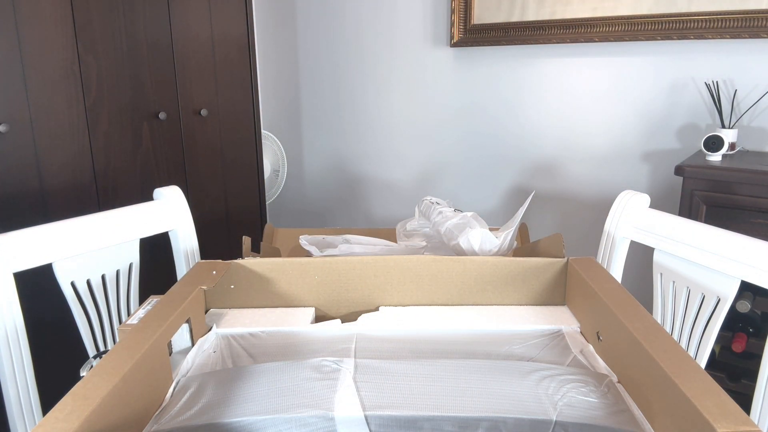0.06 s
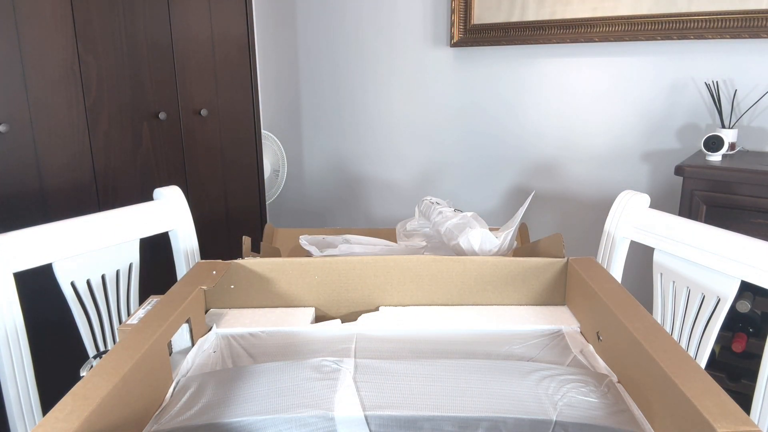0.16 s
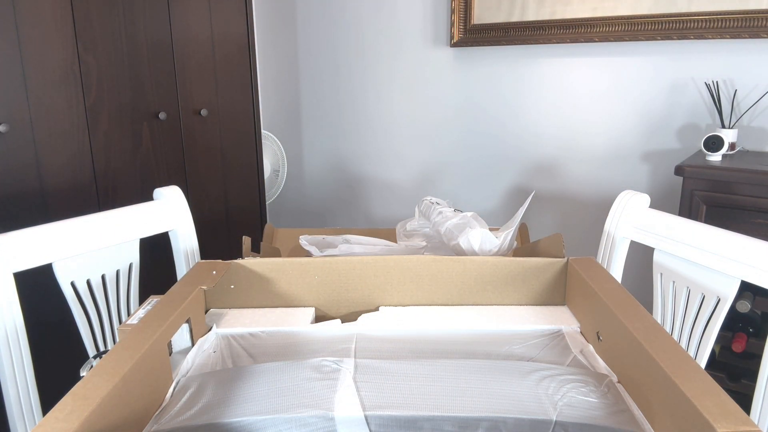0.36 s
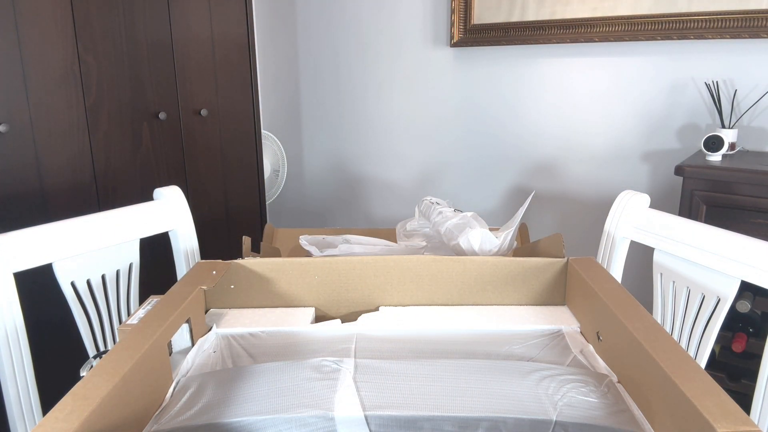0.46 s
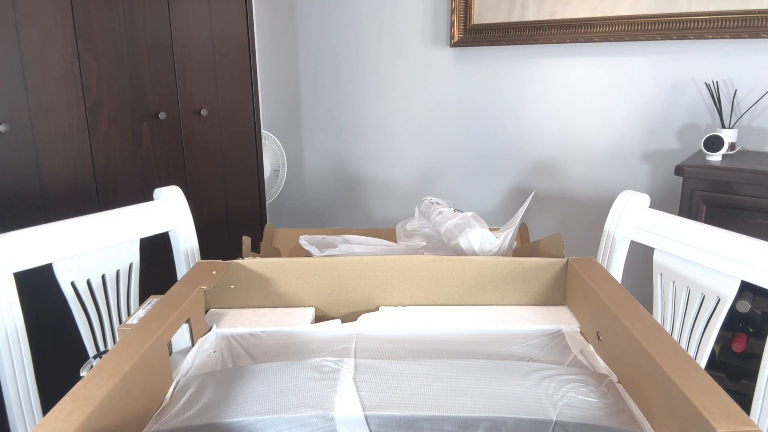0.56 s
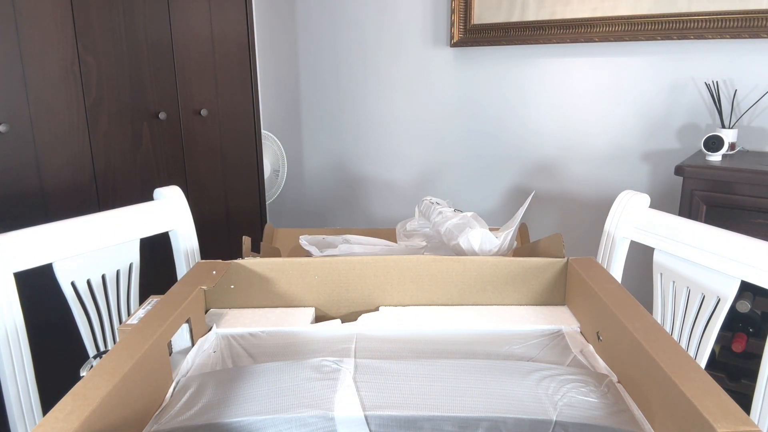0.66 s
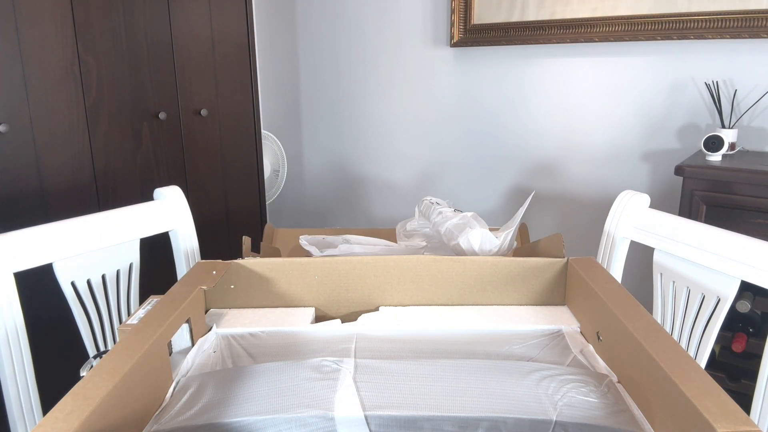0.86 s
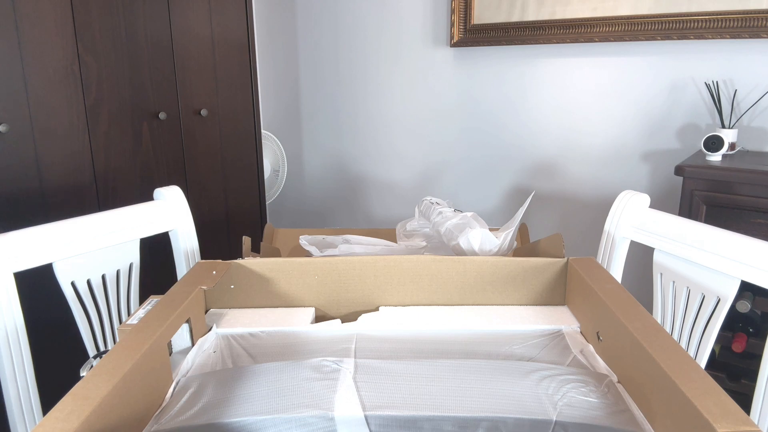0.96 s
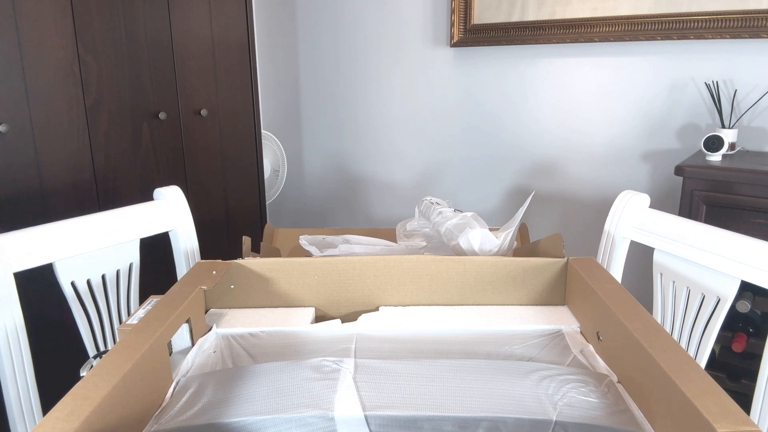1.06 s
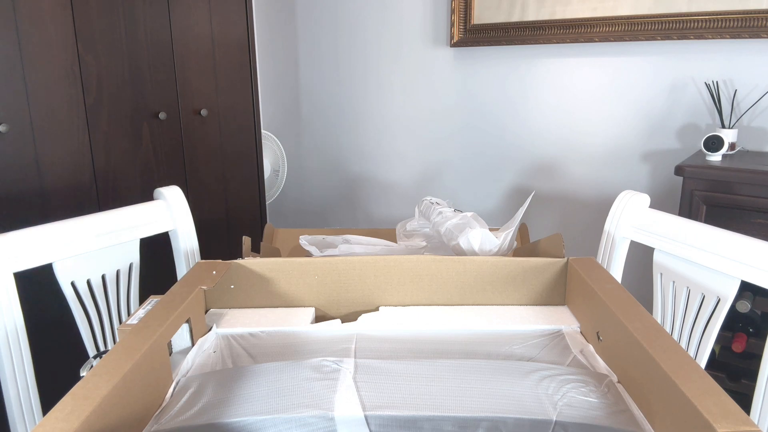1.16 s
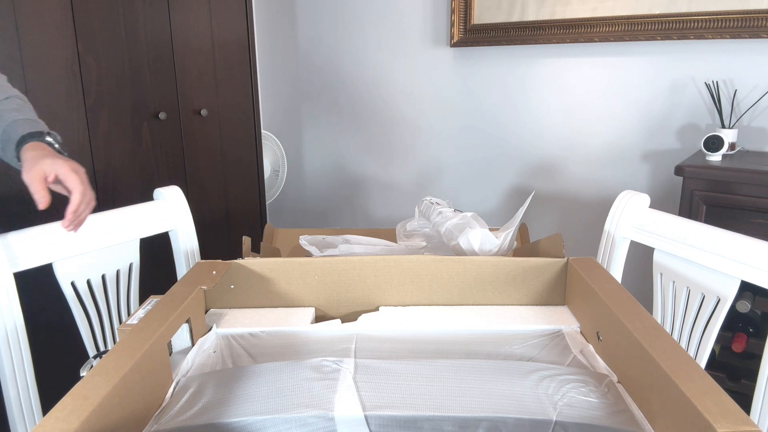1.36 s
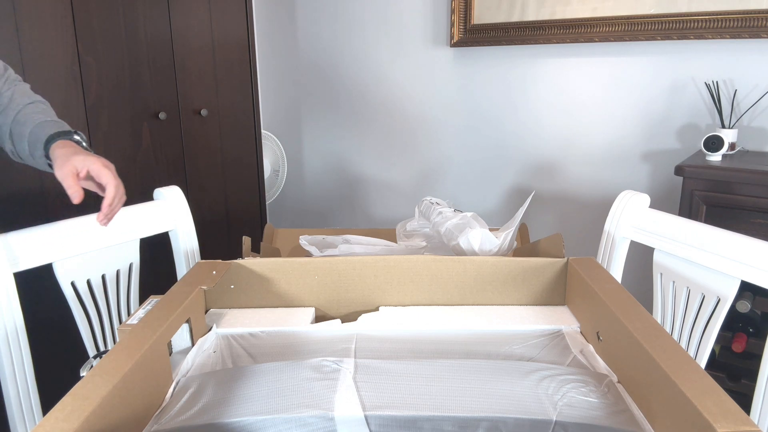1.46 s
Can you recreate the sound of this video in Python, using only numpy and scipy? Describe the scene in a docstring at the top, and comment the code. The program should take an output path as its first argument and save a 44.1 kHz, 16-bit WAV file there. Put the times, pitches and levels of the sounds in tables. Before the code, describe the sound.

Packing foam being worked out of a cardboard box: soft rubbing, dull thumps, brief creak, fading scuffs.

```python
"""A foam insert is worked out of a cardboard box in a furnished room, heard by a stereo microphone.
Foam first hisses on the card, as fine random grains; a cluster of dull blows then excites the box modes.
More blows follow, with a brief creak of regular slips and a shudder of dense slips on the same panels.
After a lull, weaker rubbing, shudders and blows go on and fade. Throughout, the room answers with a
decaying noise tail, over a steady room tone of shaped noise."""
import sys
import numpy as np
from scipy import signal
from scipy.fft import rfft, irfft, next_fast_len
from scipy.io import wavfile
from scipy.ndimage import uniform_filter1d

SR = 44100
rng = np.random.default_rng(int(sys.argv[2]) if len(sys.argv) > 2 else 0)


def log_audio(samples):
    """Write samples as a 16-bit WAV file to the path given in sys.argv[1]."""
    # one column per channel
    frames = np.atleast_2d(samples).T
    # limit to full scale, then quantise
    limited = np.clip(frames, -1, 1)
    pcm = np.round(limited * 32767).astype(np.int16)
    wavfile.write(sys.argv[1], SR, pcm)


def elevation(decibels):
    """Turn decibel levels (scalar or array-like) into linear amplitude ratios."""
    levels = np.asarray(decibels, float)
    return 10 ** (levels / 20)


N = 66150

# Blows on the box. Each row: start in seconds, force level in dB, centre in Hz of the modes struck
# hardest, level in dB of the extra force on the boom modes.
BLOW_EVENTS = [(0.176, -38, 820, -87), (.238, -20.5, 795, -60), (0.242, -30.5, 594, -25.5),
               (.244, -22, 140, -37.5), (0.254, -31.5, 930, -37), (.266, -28.5, 796, -30),
               (.28, -27, 390, -47), (0.293, -78, 800, -24), (.385, -20.5, 454, -60), (.397, -24, 280, -78),
               (0.415, -28.5, 510, -20.5), (.436, -27.5, 680, -34.5), (.575, -45.5, 228, -38.5),
               (0.66, -51, 55, -65), (.833, -41.5, 452, -48), (0.841, -61, 400, -63),
               (0.874, -43.5, 413, -55), (.932, -45, 354, -33.5), (0.941, -42, 184, -52),
               (.969, -50, 218, -32), (.997, -43.5, 220, -43.5), (1.044, -50.5, 300, -54),
               (1.087, -57, 204, -39.5), (1.13, -56, 243, -39.5), (1.17, -50, 287, -68),
               (1.198, -38, 189, -79), (1.202, -43, 54, -76), (1.242, -50, 302, -41),
               (1.275, -51.5, 192, -37.5), (1.321, -60, 163, -85), (1.373, -55, 149, -65),
               (1.478, -50.5, 63.5, -68)]
BLOW_REACH_OCTAVES, BLOW_CONTACT_MS = 0.78, 0.41
# Modes of the box. Each row: frequency in Hz, gain in dB, decay time T60 in seconds.
BOX_MODES = [(55.5, -12, 0.45), (82.8, -3.5, 0.14), (106.1, 2, 0.2), (149.6, 7, 0.11), (195, -1, 0.15),
             (228, -2.5, 0.15), (265, -9, 0.18), (303, -6.5, 0.16), (336, -3, 0.17), (400, -6.5, 0.093),
             (459.5, -6.5, 0.2), (529.8, -1.5, 0.065), (617, -5.5, 0.089), (680, -1, 0.062),
             (788.5, -3, 0.055), (876, -6, 0.056), (959, -1, 0.047), (1123.6, -2, 0.035),
             (1280, -19.5, 0.11), (1360, -13.5, 0.035)]
BOOM_BELOW_HZ = 130  # modes under this are the boom of the whole box

# Foam sticking and slipping evenly along a panel. Each row: time in seconds, slips per second,
# slip level in dB.
CREAK_CURVE = [(.386, 100, -60), (.39, 99, -36), (.42, 101, -31.5), (.445, 112, -28), (.48, 112, -42.5),
               (.515, 112, -53.5), (.535, 108, -71)]
CREAK_SPOT_HZ, CREAK_REACH_OCTAVES, CREAK_SCATTER_DB = 355, 0.49, 3

# Foam shuddering on the panels. Each row: time in seconds, level in dB of the slips before smoothing,
# centre in Hz of the modes rubbed hardest.
SHUDDER_CURVE = [(0, -108, 592), (.06, -80.5, 704), (.145, -86, 1110), (.172, -105, 900), (.18, -95, 710),
                 (.236, -57, 684), (.242, -80, 750), (.33, -61.5, 537), (.383, -84, 500), (.387, -51, 450),
                 (.45, -63, 430), (.52, -68, 374), (.6, -82.5, 255), (.7, -105, 302), (.831, -103, 508),
                 (.835, -95, 432), (.885, -120, 460), (.92, -76, 453), (.94, -82, 396), (1.14, -86, 460),
                 (1.21, -76.5, 690), (1.3, -81, 505), (1.5, -105, 400)]
SHUDDER_PER_S, SHUDDER_SPREAD_DB, SHUDDER_REACH_OCTAVES = 810, 0.5, 1

# Foam sliding on card. Each row: time in seconds, middle band level in dB, treble band level in dB,
# both before the flicker.
RUB_CURVE = [(0, -99, -94), (.022, -55.5, -69), (.05, -44, -50), (.095, -53.5, -55.5), (.165, -67, -72.5),
             (.185, -51.5, -61.5), (.233, -54, -56), (.245, -47, -51.5), (.29, -58, -59.5), (.35, -55, -58),
             (.385, -52.5, -49.5), (.44, -54.5, -50), (.475, -55.5, -54.5), (.52, -57, -53.5),
             (.65, -77.5, -78), (.82, -59, -62), (.92, -73, -79.5), (.935, -56, -60), (.99, -61.5, -52.5),
             (1.06, -62, -61), (1.145, -66, -65.5), (1.165, -55.5, -54), (1.215, -60.5, -58),
             (1.35, -69.5, -75.5), (1.5, -75, -71.5)]
# Spectra of the middle and treble bands of the rub. Each row: frequency in Hz, relative gain in dB.
RUB_MIDDLE_SPECTRUM = [(300, 1.5), (600, 14.5), (1150, 14), (1600, 5.5), (2400, 4.5), (3500, 1), (5500, 2),
                       (8500, -29)]
RUB_TREBLE_SPECTRUM = [(4000, -18.5), (9000, -7.5), (11000, -1.5), (13000, -3.5), (15000, -11.5)]
GRAINS_PER_S, GRAIN_SPREAD_DB = 13000, 2
FLICKER_RAW_DB = 1.56  # standard deviation before smoothing

# Reverberation time of the room. Each row: frequency in Hz, T60 in seconds.
ROOM_DECAY = [(60, 1), (300, 0.36), (1000, 0.23), (4000, 0.19), (14000, 0.021)]
# Strength of the room tail. Each row: frequency in Hz, level in dB against the direct sound.
ROOM_LEVEL = [(90, -12), (180, -8), (360, 0), (1000, 2), (4000, 4), (8000, -1), (13000, -8)]
ROOM_GAP_S = 0.0033  # silence before the tail
# Spectrum of the room tone. Each row: frequency in Hz, relative gain in dB.
ROOM_TONE_SPECTRUM = [(25, -29), (60, 4), (150, -2), (400, -7), (1000, -16.5), (2500, -23), (6000, -32),
                      (12000, -29)]
ROOM_TONE_DB = -58

SAME_BELOW_HZ, SAME_ABOVE_HZ = 264, 9300  # the channels' noise grows alike beyond these
RIGHT_LATE_MS, RIGHT_TURN_HZ, LOW_CUT_HZ = 0.207, 1200, 45
# Balance of the channels. Each row: frequency in Hz, left minus right in dB.
CHANNEL_BALANCE = [(60, -0.5), (330, -3), (700, 1), (3500, -3.5), (9000, .5)]

T = np.arange(N) / SR
SIZE = next_fast_len(2 * N)
HZ = np.fft.rfftfreq(SIZE, 1 / SR) + 1  # raised by 1 Hz to keep logarithms finite


def on_log(hz, table):
    """Interpolation of (Hz, value) points is linear in log frequency."""
    points_hz, values = np.array(table).T
    return np.interp(np.log(hz), np.log(points_hz), values)


def shaped(x, gain):
    """A linear filter multiplies the spectrum by its gain at every frequency."""
    return irfft(rfft(x, SIZE) * gain, SIZE)[..., :N]


def unit(x):
    """Division by the root mean square normalizes a signal to rms 1."""
    return x / np.sqrt(np.mean(x ** 2))


def column(table, index):
    """One column of a curve is joined linearly in time."""
    table = np.array(table)
    return np.interp(T, table[:, 0], table[:, index])


def grains(per_s, spread_db):
    """Random impulses of both signs, with a long tail of large ones, model irregular friction."""
    hit = rng.random(N) < per_s / SR
    size = elevation(spread_db * rng.exponential(size=N))
    return unit(hit * rng.standard_normal(N) * size)


def near_spot(hz, spot_hz, reach_octaves):
    """Modal coupling at a touched spot falls as a Gaussian of the distance in octaves."""
    return np.exp(-0.5 * (np.log2(hz / spot_hz) / reach_octaves) ** 2)


def box(push):
    """Modal superposition: each mode is a damped resonator driven by its own force push(hz)."""
    out = 0
    for k, (hz, db, t60) in enumerate(BOX_MODES):
        pole = np.exp(2j * np.pi * hz / SR - np.log(1000) / (t60 * SR))
        ringing = signal.lfilter([1], [1, -pole], push(hz)).imag
        out = out + (-1) ** k * elevation(db) * ringing  # neighbouring modes take opposite signs
    return out


def blows():
    """Impact excitation: a short push favours the modes of the spot where it lands."""
    start_s, db, spot_hz, boom_db = np.array(BLOW_EVENTS).T
    contact = np.hanning(int(BLOW_CONTACT_MS * SR / 1000) + 3)
    contact = contact / contact.sum()

    def push(hz):
        force = np.zeros(N)
        struck = elevation(db) * near_spot(hz, spot_hz, BLOW_REACH_OCTAVES)
        boom = elevation(boom_db) * (hz < BOOM_BELOW_HZ)
        force[(start_s * SR).astype(int)] = struck + boom
        return np.convolve(force, contact)[:N]
    return box(push)


def creak():
    """Stick-slip: regular slips of uneven size make the panels sing on multiples of the slip rate."""
    cycle = np.floor(np.cumsum(column(CREAK_CURVE, index=1)) / SR).astype(int)
    size = elevation(CREAK_SCATTER_DB * rng.standard_normal(N))[cycle]
    during = (T > CREAK_CURVE[0][0]) & (T < CREAK_CURVE[-1][0])
    onset = np.diff(cycle, prepend=0)
    slips = onset * size * during * elevation(column(CREAK_CURVE, index=2))
    return box(lambda hz: slips * near_spot(hz, CREAK_SPOT_HZ, CREAK_REACH_OCTAVES))


def shudder():
    """Irregular stick-slip: dense slips excite the same panels at a wandering spot."""
    slips = grains(SHUDDER_PER_S, SHUDDER_SPREAD_DB) * elevation(column(SHUDDER_CURVE, index=1))
    slips = uniform_filter1d(slips, size=9)  # finite contact time, in samples
    spot_hz = column(SHUDDER_CURVE, index=2)
    return box(lambda hz: slips * near_spot(hz, spot_hz, SHUDDER_REACH_OCTAVES))


def rub():
    """Sliding friction: fine grains form a middle band and a treble sheen, flickering together."""
    hold = SR // 40
    steps = np.repeat(rng.standard_normal(N // hold + 1), hold)
    flicker = uniform_filter1d(steps, hold)[:N]
    grit = grains(GRAINS_PER_S, GRAIN_SPREAD_DB)
    middle = unit(shaped(grit, elevation(on_log(HZ, RUB_MIDDLE_SPECTRUM))))
    treble = unit(shaped(grit, elevation(on_log(HZ, RUB_TREBLE_SPECTRUM))))
    middle = middle * elevation(column(RUB_CURVE, index=1))
    treble = treble * elevation(column(RUB_CURVE, index=2))
    return elevation(FLICKER_RAW_DB * flicker) * (middle + treble)


def pair():
    """Partial coherence: noise for two channels is alike in the bass and in the top treble."""
    a, b = rng.standard_normal((2, N))
    apart = 1 / (1 + (SAME_BELOW_HZ / HZ) ** 2) / (1 + (HZ / SAME_ABOVE_HZ) ** 6)
    mid = shaped(a, np.sqrt(2 - apart))
    side = shaped(b, np.sqrt(apart))
    return np.array([mid + side, mid - side]) / np.sqrt(2)


def room(x):
    """Reverberation: convolution with a two-channel noise tail that decays band by band."""
    noise, tail = pair(), 0
    late = np.clip(T - ROOM_GAP_S, 0, None)
    for hz in 45 * 2. ** np.arange(9):  # octave centres
        band = shaped(noise, np.clip(1 - abs(np.log2(HZ / hz)), 0, 1))
        fade = (T > ROOM_GAP_S) * elevation(-60 * late / on_log(hz, ROOM_DECAY))
        fade = fade / np.sqrt(np.sum(fade ** 2))  # unit energy
        tail = tail + band * fade * elevation(on_log(hz, ROOM_LEVEL))
    return shaped(tail, rfft(x, SIZE))


def room_tone():
    """Stationary background: two-channel noise is filtered to a fixed spectrum."""
    return unit(shaped(pair(), elevation(on_log(HZ, ROOM_TONE_SPECTRUM)))) * elevation(ROOM_TONE_DB)


def scene():
    """Superposition: direct sound of box and foam, its room tail and the room tone add linearly."""
    near = blows() + creak() + shudder() + rub()
    return near + room(near) + room_tone()


def top_cut(x):
    """Nothing passes above the cut-off."""
    return signal.sosfilt(signal.butter(12, 15890, fs=SR, output="sos"), x)


def record(dry):
    """Channel filtering: delay and all-pass phase on the right, a balance tilt and a deep-bass cut."""
    delay = 2 * np.pi * HZ * RIGHT_LATE_MS / 1000
    turn = 2 * np.arctan(HZ / RIGHT_TURN_HZ)  # a quarter cycle at the turn, nearing half above
    tilt = elevation(on_log(HZ, CHANNEL_BALANCE) / 2)  # half to each channel
    low_cut = (1j * HZ / (LOW_CUT_HZ + 1j * HZ)) ** 2
    channels = np.array([tilt, np.exp(-1j * (delay + turn)) / tilt])
    mix = shaped(dry, low_cut * channels)
    return top_cut(mix)


dry = scene()
out = record(dry)
log_audio(out)
```